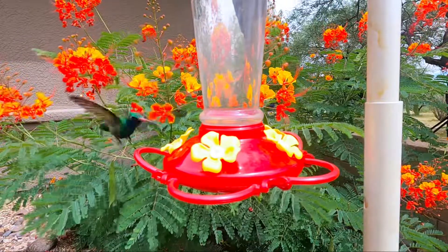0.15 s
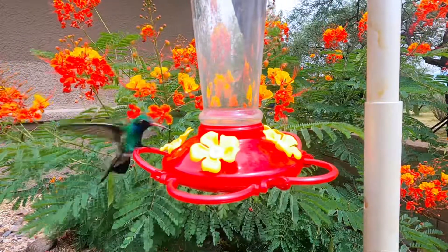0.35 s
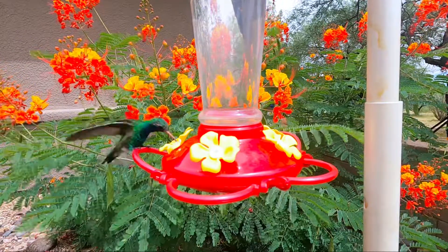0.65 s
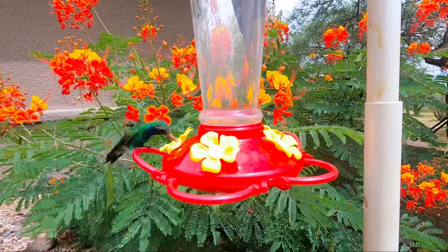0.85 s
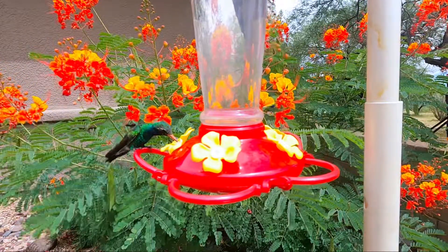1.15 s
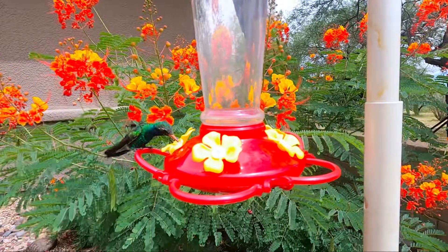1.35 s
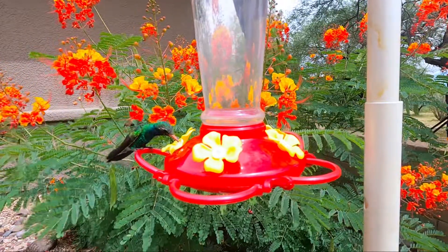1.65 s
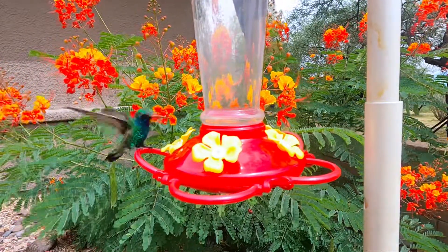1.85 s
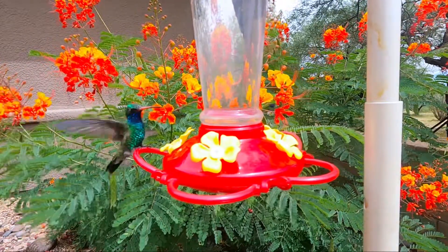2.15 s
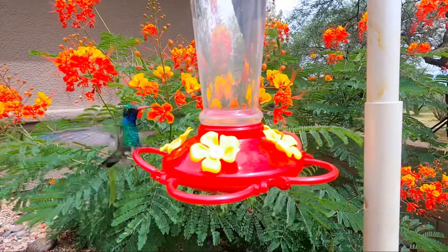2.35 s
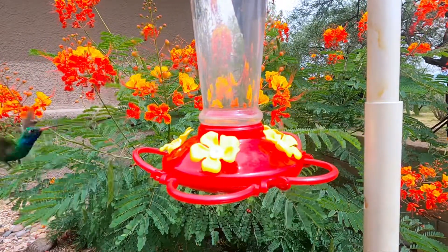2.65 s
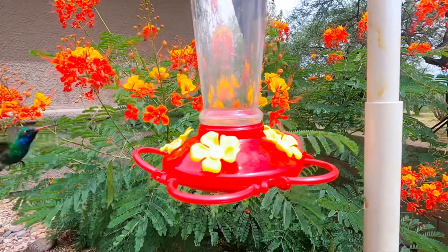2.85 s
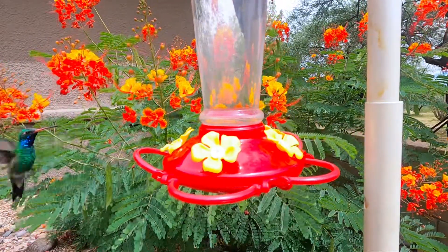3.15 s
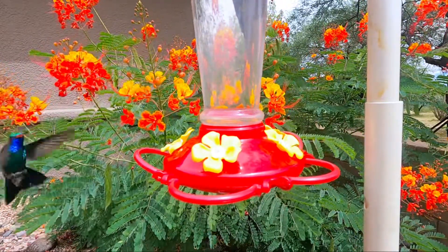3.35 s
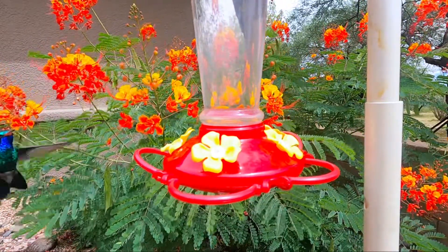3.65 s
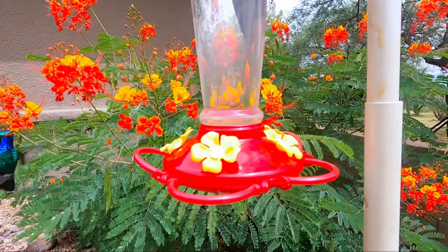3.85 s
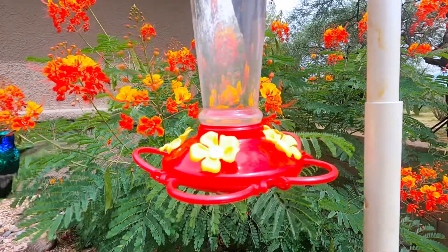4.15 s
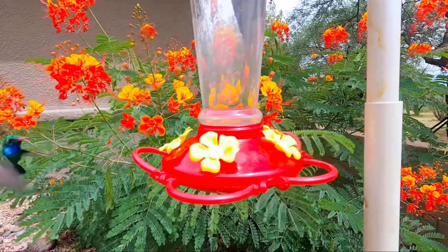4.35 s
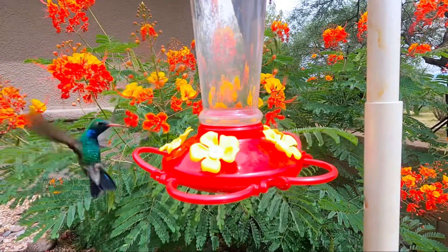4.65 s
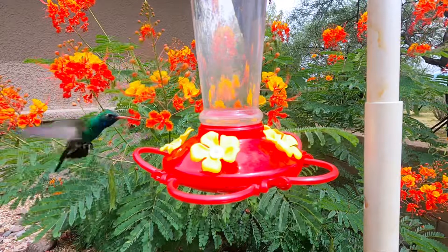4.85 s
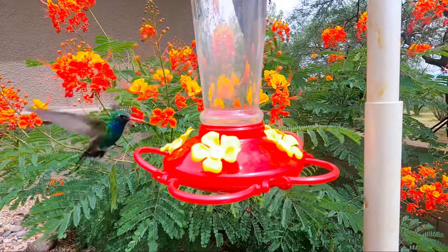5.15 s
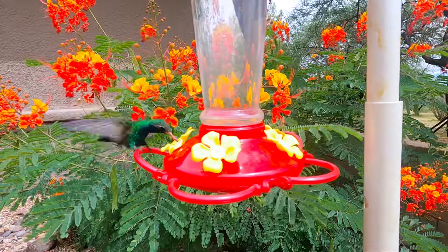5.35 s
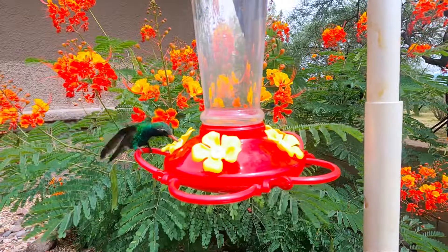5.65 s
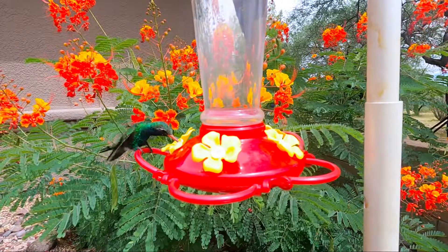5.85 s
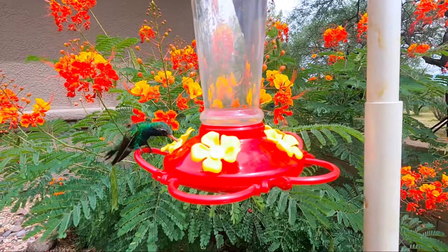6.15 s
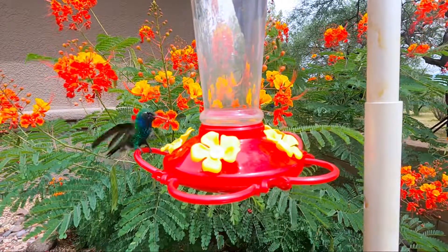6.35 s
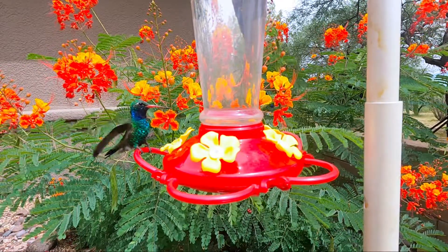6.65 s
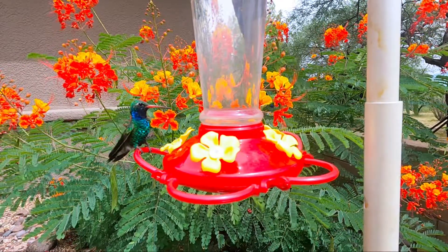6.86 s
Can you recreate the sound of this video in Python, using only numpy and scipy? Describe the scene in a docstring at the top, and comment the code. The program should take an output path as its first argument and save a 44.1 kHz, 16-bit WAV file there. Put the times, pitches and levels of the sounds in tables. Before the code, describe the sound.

Very close to the microphone, a hummingbird's wings throb deeply with airy swishes as it reaches a feeder, giving two quick sharp chips. It settles into near quiet, flutters, then takes off with a heavy burst, feather flicks and one chip. Hovering continues steadily until three more chips and strong flurries, then it lands and quiets. Low wind rumble and faint leaf hiss fill the yard.

```python
"""A hummingbird, close to the microphone, flies at a garden feeder in two spells and flutters on the perch between.
Its wings throb about sixteen times a second as overtones of the wingbeat; filtered noise gives the air rush
and a swish at each turn of the wing. Short noise bursts are feather flicks and the soft lead-in note of a chip;
six chips are fast-warbling whistles. A faint hum swells briefly as the bird sips. Flicks and chips echo off the
near surfaces; a low rumble of wind at the microphone and soft leaf hiss fill the quiet yard."""
import sys
import numpy as np
from scipy import signal
from scipy.fft import rfft, irfft
from scipy.io import wavfile

SR = 44100
rng = np.random.default_rng(int(sys.argv[2]) if len(sys.argv) > 2 else 0)


def to_wav(s):
    """Save 16-bit WAV."""
    ch = np.atleast_2d(s).T  # columns
    pcm = np.round(np.clip(ch, -1, 1) * 32767)  # PCM
    wavfile.write(sys.argv[1], SR, pcm.astype(np.int16))


N = 309126
TIME = np.arange(N) / SR

# speed of the wings: t/s, rate/(wingbeats per s)
WING_RATE = [(0, 15.7), (.3, 17.2), (.8, 13.4), (2.4, 15.1), (2.75, 21.1), (3.15, 14.6), (3.6, 17),
             (4.1, 15.8), (4.55, 14.8), (4.75, 19.1), (5.05, 15.6), (5.35, 16.6), (5.8, 14.3)]
FIRST_STROKE_S = .023
# spells of free flight, fluttering on the perch in between: take-off t/s, landing t/s
FLIGHTS = [(-.2, .62), (2.62, 5.64)]
SETTLE_S = 0.087  # time to take off or settle
# darts, turns and bursts of fluttering on the perch: t/s, half width/s, throb gain/dB, rush gain/dB
BURSTS = [(.3, .04, 6, 4), (2.02, .06, 11, 7), (2.67, 0.051, 22.5, 4.5), (2.869, 0.089, 23.5, 10),
          (4.63, 0.08, 14, 6.5), (4.92, 0.054, 16.5, 7.5)]
# wing throb before bursts and trim: t/s, level/dB
THROB_LEVEL = [(0, -38.5), (.58, -42.5), (.72, -53.5), (1.15, -51.5), (1.4, -67.5), (1.63, -50),
               (2.2, -50.5), (2.4, -56), (3.05, -53.5), (3.4, -47.5), (3.65, -42.5), (4.3, -46), (5.1, -48),
               (5.4, -40.5), (5.65, -46), (5.76, -63), (6.2, -68.5), (6.4, -52.5)]
# overtones of the wingbeat in steady flight: multiple of the wingbeat, relative level/dB
WING_OVERTONES = [(1, 2.5), (2, 3), (3, -8), (4, -3), (5, -5.5), (6, -12), (8, -19.5), (12, -31.5)]
# spectrum of the eddies behind the wing: f/Hz, relative level/dB per Hz
EDDY_SPECTRUM = [(10, 2.5), (30, -1.5), (70, -3.5), (120, -16.5), (200, -21), (400, -38.5), (1000, -40.5),
                 (4000, -88.5)]
# strokes whose downwash hits the microphone, before pan and low cut: t/s, peak level/dB, half width/s
PUFFS = [(0.509, -32.5, 0.005886), (.571, -24.5, 0.0036866), (2.682, -27, .0042), (2.735, -34.5, 0.00218),
         (4.855, -21, 0.00494), (4.909, -22, 0.003972), (5.033, -33, 0.003589)]
# air through the feathers before bursts and trims: t/s, level/dB
RUSH_LEVEL = [(0, -74.5), (.62, -69), (.9, -91), (1.85, -84.5), (1.9, -67.5), (3.1, -70.5), (4.4, -73),
              (5.3, -68.5), (5.85, -74), (6.05, -83), (6.6, -74.5), (7.01, -80.5)]
# spectrum of the rush: f/Hz, relative level/dB per Hz
RUSH_SPECTRUM = [(150, -10), (500, 5), (1200, -1), (2000, -4.5), (3200, -2), (4300, -9), (6000, -15.5),
                 (7000, -24), (8000, -38)]
# spectrum of the swish: f/Hz, relative level/dB per Hz
SWISH_SPECTRUM = [(700, -10.5), (2200, 2), (3800, 7.5), (6000, -3), (7200, -12), (9000, -31)]
# spectrum of the yard air: f/Hz, relative level/dB per Hz
YARD_SPECTRUM = [(20, -4), (45, -12.5), (85, -2.5), (170, -9.5), (260, -13.5), (400, -18.5), (530, -14),
                 (750, -19), (950, -28), (1300, -31), (1700, -34.5), (3200, -31), (4200, -39.5),
                 (5200, -47.5), (6500, -51), (8000, -72)]
YARD_DB = -58.5
# the yard's lean, lows to the right and highs to the left: f/Hz, left-right level/dB
YARD_LEAN = [(60, -5.5), (150, -4.5), (480, 0.5), (2300, 1), (6500, 6)]
# likeness of left and right in the wing and yard noise: f/Hz, correlation (0-1)
STEREO_LIKENESS = [(60, .65), (230, 0.19), (900, 0.63), (1700, 0.32), (3300, 0.92), (6500, 0.15)]
# faint low hum while the bird sips: t/s, level/dB
HUM_LEVEL = [(.9, -94.5), (1.02, -66), (1.27, -67), (1.36, -93.5)]
# spectrum of the hum, a narrow peak: f/Hz, relative level/dB per Hz
HUM_SPECTRUM = [(116, -60), (202, -20), (232, 0), (262, -20), (464, -70)]
# feather flicks in flight and on the perch, and at 4.677 s the soft lead-in note of a chip:
# t/s, level/dB, pitch f/Hz (band spans 0.32-0.75 f), decay/s
FLICKS = [(0.278, -51, 900, 0.00453), (0.795, -62, 4000, 0.0029), (1.903, -52, 1000, 0.007835),
          (1.984, -55, 803.6, 0.05052), (2.615, -57.5, 4509, 0.003633), (2.643, -50, 900, 0.0043),
          (2.659, -47, 3800, .003), (2.665, -50, 1100, 0.01482), (2.69, -47.5, 2600, 0.0042),
          (2.7104, -39.5, 1610, 0.0016), (2.767, -46.5, 3032, .0015), (4.593, -51, 2400, 0.002775),
          (4.677, -38.5, 3020, .0021), (6.567, -63.5, 2422, 0.0056), (6.639, -69, 4440, 0.0576)]
# chips: first crest t/s, lead-in/s, length after crest/s, crest f/Hz, level/dB,
# overtone level/dB, left-right level/dB at 3 kHz
CHIPS = [(0.3852, 0.008337, 0.038184, 3195, -18.5, 1.5, 1.5), (.4618, .0042, 0.03184, 3286, -18, 2, 1.5),
         (2.8099, .0042, .035, 3306, -22, 2, 2.5), (4.6855, .0045, 0.036678, 3190, -19.5, -1, 2.5),
         (4.7515, .0044, .0335, 3334, -19, 3.5, 3.5), (4.8471, .004, .0305, 3162, -21, 3, 2)]
# harmonics of the voice, from the first upwards: relative level/dB
VOICE_HARMONICS = [-1, -4.5, -7, -16.5, -23.5]
# resonance of throat and bill: f/Hz, gain/dB
THROAT = [(500, -18), (1100, -8.5), (1600, -11.5), (2300, -3), (2900, 1), (3500, 1), (4000, -6),
          (4700, -13), (6000, -18), (7500, -32), (9000, -51)]
# starting swing rate, then trough pitch and final sag as shares of the crest pitch
WARBLE_HZ, TROUGH, SAG = 143.41, .45, 0.13
LAST_TROUGH = 4.5  # swings after the first crest where the swinging stops, if the chip lasts that long
# echoes of the feeder, post and wall: delay t/s, level/dB
ECHOES = [(.0011, -33), (.0019, -28), (.0027, -22), (.0043, -27.5), (.0079, -25.5), (.0097, -28)]
# decay of the yard's tail: f/Hz, time to fall 60 dB t/s
YARD_DECAY = [(500, .25), (2000, .36), (3300, 0.38), (7000, 0.15)]


def gain_of(db):
    """Turns decibels into an amplitude factor."""
    return 10 ** (np.asarray(db) / 20)


def evened(x):
    """Scales to rms 1."""
    return x / np.sqrt(np.mean(x ** 2) + 1e-20)


def read(points, hz):
    """Reads a table on a log-frequency axis."""
    f, value = np.transpose(points)
    return np.interp(np.log(hz + 1), np.log(f + 1), value)


def curve(rows):
    """Reads a table at every sample."""
    return np.interp(TIME, *np.transpose(rows))


def panned(x, left_db):
    """Places a mono sound between left and right by level."""
    return x * gain_of([[left_db / 2], [-left_db / 2]])


def bell(distance, width):
    """A bell-shaped pulse, 1 at its middle."""
    return np.exp(-.5 * (distance / width) ** 2)


def drift(count):
    """Smooth random wander of rms 1, through count random points over the whole scene."""
    return evened(signal.resample(rng.standard_normal(count), N))


def noise(spectrum, lean=((0, 0), (SR, 0))):
    """Coloured stereo noise of rms 1, partly alike in both channels."""
    hz = np.fft.rfftfreq(N, 1 / SR)
    a, b = rfft(rng.standard_normal((2, N)))
    same = read(STEREO_LIKENESS, hz)
    side = gain_of(read(lean, hz) / 2)
    right = same * a + np.sqrt(1 - same ** 2) * b
    pair = np.array([a * side, right / side])
    return evened(irfft(pair * gain_of(read(spectrum, hz)), N))


def band_noise(low_hz, high_hz, order, count):
    """Mono noise of rms 1 between two frequencies."""
    band = signal.butter(order, [low_hz, high_hz], "band", fs=SR)
    return evened(signal.lfilter(*band, rng.standard_normal(count)))


def airborne():
    """1 in free flight, 0 on the perch, with ramps at take-off and landing."""
    return sum(np.clip(np.minimum(TIME - up, down - TIME) / SETTLE_S + .5, 0, 1) for up, down in FLIGHTS)


def bursts():
    """Bell-shaped swells: how hard the wings work (0-1), and the dB this adds to throb and rush."""
    s, width, throb_db, rush_db = np.transpose(BURSTS)
    bells = bell(TIME - s[:, None], width[:, None])
    return np.minimum(bells.sum(0), 1), throb_db @ bells, rush_db @ bells


def stroke(beats, at, width):
    """A bell-shaped pulse once in every wingbeat; place and width are shares of a beat."""
    return bell((beats - at + .5) % 1 - .5, width)


def wing_throb(beats, flying, bursting, burst_db, soft_db=5.5, round_db=2, even_db=7):
    """Each downstroke is a dip in pressure, rich in overtones; eddies trail behind as low noise."""
    turns = beats + .03 * drift(count=150)
    # strokes on the perch and in bursts are rounder: dB lost per overtone
    gentle_db = soft_db * (1 - flying) + round_db * bursting
    wave = np.zeros(N)
    for k in range(1, 13):
        # in bursts the upstroke pushes too, so odd overtones fade
        odd_loss_db = k % 2 * even_db * bursting
        level_db = read(WING_OVERTONES, k) - (k - 2) * gentle_db - odd_loss_db
        wave -= gain_of(level_db) * np.cos(2 * np.pi * k * turns)
    uneven_db = 2 * drift(count=110)
    wave = evened(wave * gain_of(uneven_db))
    eddies = gain_of(-5) * evened(noise(EDDY_SPECTRUM)[0])
    trim_db = 1
    pressure = gain_of(curve(THROB_LEVEL) + burst_db + trim_db) * (wave + eddies)
    for s, db, half_width in PUFFS:
        # a passing vortex: a push, a deep dip, a push
        u = (TIME - s) / half_width
        pressure += gain_of(db) * (u ** 2 - 1) * np.exp(-.5 * u ** 2)
    low_cut = signal.butter(1, 12, "high", fs=SR)
    return panned(signal.lfilter(*low_cut, pressure), -1)


def feather_swish(beats, flying, burst_db, full_speed_hz=16.6, perched=.1):
    """A grainy rush of air, and a short bright swish at each turn of the wing, strongest in flight."""
    turns = stroke(beats, .53, .05) + .65 * stroke(beats, .02, .05)
    # 1 dB softer per wingbeat per second below full speed, at most 1.5 dB
    slow_db = np.clip(curve(WING_RATE) - full_speed_hz, -1.5, 0)
    # in bursts the rush outgrows the swish
    swish_db = 2.5 + slow_db - .35 * burst_db + 1.6 * drift(count=220)
    swish = gain_of(swish_db) * np.maximum(flying, perched) * turns * noise(SWISH_SPECTRUM)
    rush_db = -1 + 2.5 * drift(count=1400)  # the fast drift is the grain
    rush = gain_of(rush_db) * noise(RUSH_SPECTRUM)
    return panned(gain_of(curve(RUSH_LEVEL) + burst_db) * (rush + swish), 1.5)


def yard_air():
    """Low wind rumble at the microphone and soft leaf hiss as drifting noise, with a brief faint hum."""
    hum = gain_of(curve(HUM_LEVEL)) * noise(HUM_SPECTRUM)
    swell_db = -0.1376 * drift(count=16)
    return gain_of(YARD_DB + swell_db) * noise(YARD_SPECTRUM, YARD_LEAN) + hum


def flicks_and_lead_in(rise_s=0.00032, top_hz=5500):
    """Bursts of band noise: quick feather flicks, longer rustles and a chip's soft lead-in note."""
    out = np.zeros(N)
    for s, db, hz, decay in FLICKS:
        u = np.maximum(TIME - s, 0)
        envelope = (1 - np.exp(-u / rise_s)) * np.exp(-u / decay)
        out += gain_of(db) * band_noise(hz * 0.32, hz * 0.75, 1, N) * envelope
    return panned(signal.lfilter(*signal.butter(2, top_hz, fs=SR), out), 1.5)


def chip(s, lead, length, crest_hz, db, reed_db, left_db, slowing=2.1, port_lag=0.37):
    """A reedy whistle swings down over an octave and back, slowing and sagging as it swells and dies."""
    at = np.arange(round((s - lead) * SR), round((s + length) * SR))
    u = at / SR - s
    swings = np.minimum(WARBLE_HZ * u * (1 - slowing * u), LAST_TROUGH)
    trough = .5 - .5 * np.cos(2 * np.pi * swings)
    hz = crest_hz * (1 - SAG * u / length - (1 - TROUGH) * trough)
    # the pitch scoops up as the voice catches and collapses as it lets go
    hz *= 1 - .4 * np.exp(-(u + lead) / .0012)
    hz *= 1 - .6 * np.exp((u - length) / .002)
    jitter = .02 * drift(count=9000)[at]
    hz = np.maximum(hz * (1 + jitter), 1)
    angle = 2 * np.pi * np.cumsum(hz) / SR
    progress = (np.arange(len(u)) + .5) / len(u)
    effort = gain_of(db) * np.sin(np.pi * progress ** 1.12) ** 0.64
    # overtones grow with effort, reaching their listed level at -17 dB
    overtone = (effort / gain_of(-17)) ** .6 * gain_of(reed_db)
    # high notes lean further to the left, and the left channel lags by port_lag radians
    halves = np.array([[.5], [-.5]])
    lean_db = halves * left_db * hz / 3000
    voice = np.zeros((2, len(u)))
    for k, level in enumerate(VOICE_HARMONICS, 1):
        gain = gain_of(level + read(THROAT, k * hz) + k * lean_db)
        growth = overtone if k > 1 else 1
        voice += gain * growth * np.sin(k * angle - port_lag * halves)
    rasp = gain_of(-28) * overtone * band_noise(2600, 4800, 2, len(u))
    out = np.zeros((2, N))
    out[:, at] = effort * (voice + rasp)
    return out


def garden(x, tail_db=-25, leaves_db=-19, leaves_decay_s=0.028):
    """Near surfaces give single echoes, foliage a quick scatter, the yard a faint tail."""
    hz, t, z = signal.stft(rng.standard_normal((2, SR // 2)), SR, nperseg=256)
    fading = z * gain_of(-60 * t / read(YARD_DECAY, hz)[:, None])
    tail = signal.istft(fading, SR, nperseg=256)[1]
    u = np.arange(tail.shape[1]) / SR
    leaves = rng.standard_normal(tail.shape) * np.exp(-u / leaves_decay_s) * (u > .001)
    response = gain_of(tail_db) * tail / np.linalg.norm(tail[0])
    response += gain_of(leaves_db) * leaves / np.linalg.norm(leaves[0])
    for delay, db in ECHOES:
        response[:, round(delay * SR)] += gain_of(db)
    return x + signal.fftconvolve(x, response, axes=1)[:, :N]


def scene():
    """Close wings without echo, flicks and calls with the garden's echo, and the yard behind."""
    beats = np.cumsum(curve(WING_RATE)) / SR
    beats = beats - beats[round(FIRST_STROKE_S * SR)]
    flying = airborne()
    bursting, throb_db, rush_db = bursts()
    wings = wing_throb(beats, flying, bursting, throb_db) + feather_swish(beats, flying, rush_db)
    air = yard_air()
    flicks = flicks_and_lead_in()
    calls = sum(chip(*row) for row in CHIPS)
    return wings + air + garden(flicks + calls)


def record(dry, dull_hz=7200, edge_hz=8000):
    """The microphone chain: a dull top end, then a steep band limit."""
    dull = signal.sosfilt(signal.butter(6, dull_hz, fs=SR, output="sos"), dry)
    band_limit = signal.firwin(255, edge_hz, window=("kaiser", 9), fs=SR)
    return signal.oaconvolve(dull, band_limit[None], "same")


dry = scene()
out = record(dry)
to_wav(out)
```